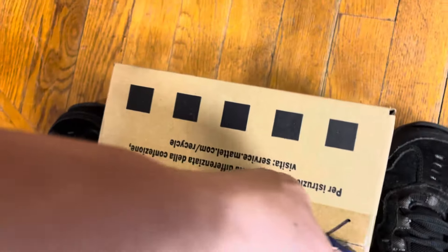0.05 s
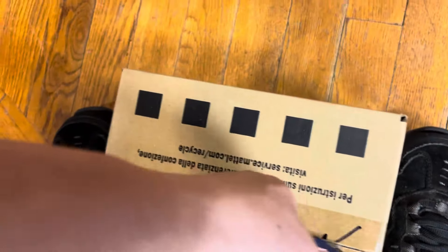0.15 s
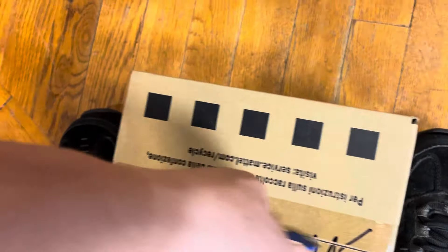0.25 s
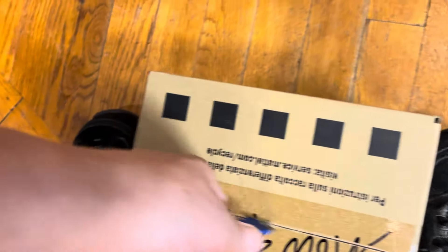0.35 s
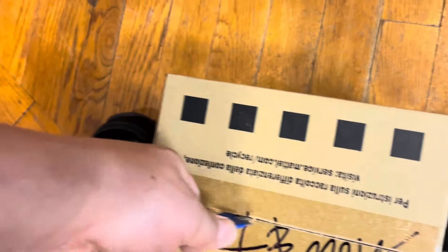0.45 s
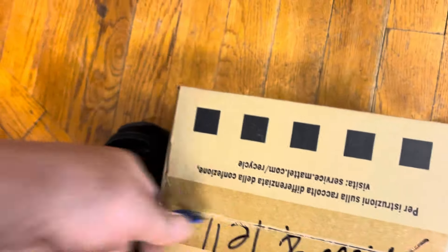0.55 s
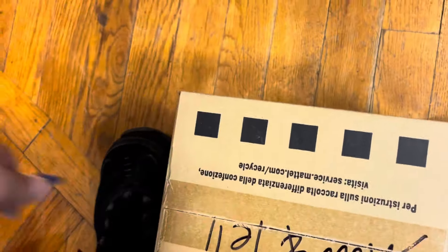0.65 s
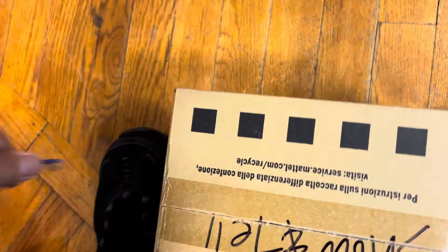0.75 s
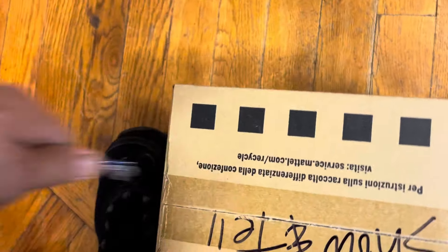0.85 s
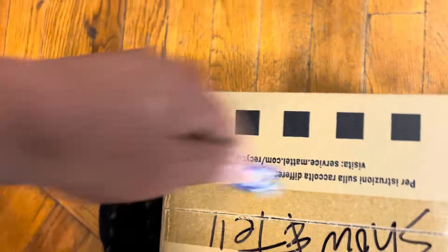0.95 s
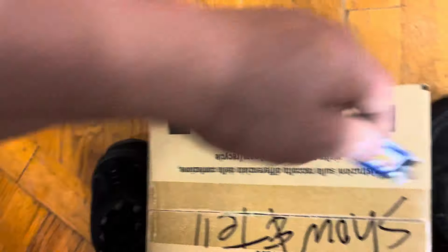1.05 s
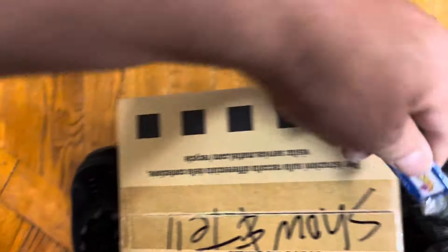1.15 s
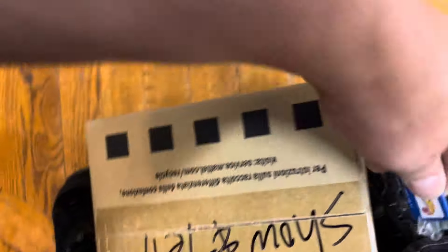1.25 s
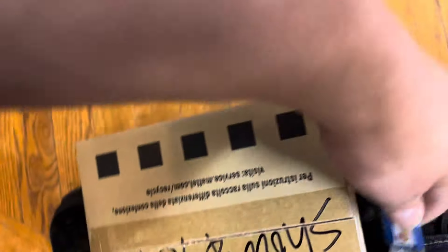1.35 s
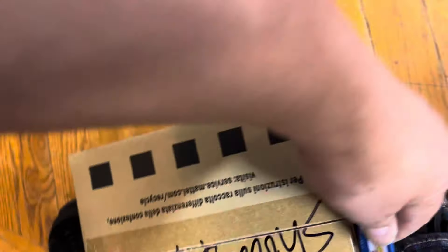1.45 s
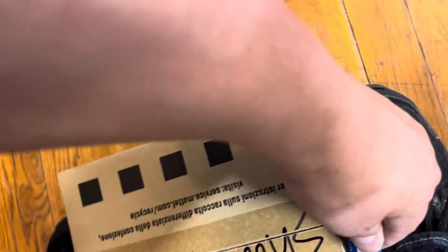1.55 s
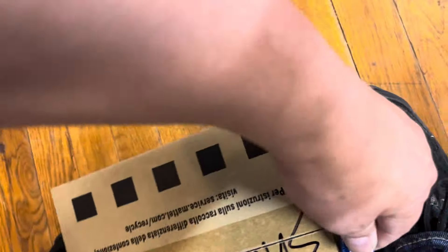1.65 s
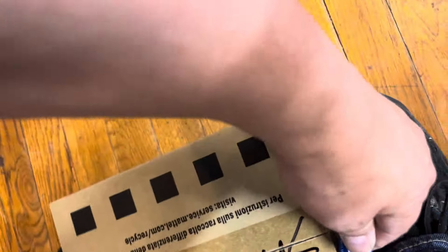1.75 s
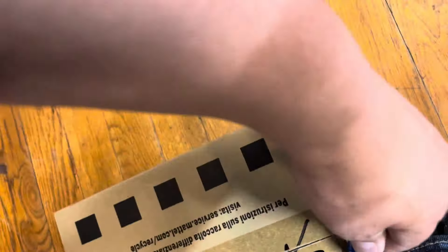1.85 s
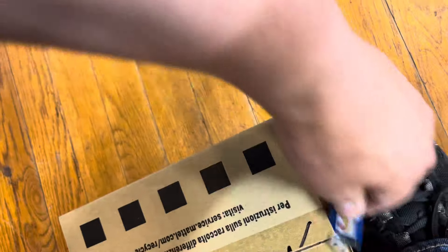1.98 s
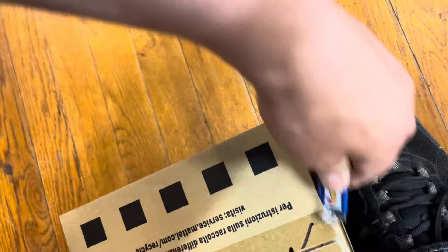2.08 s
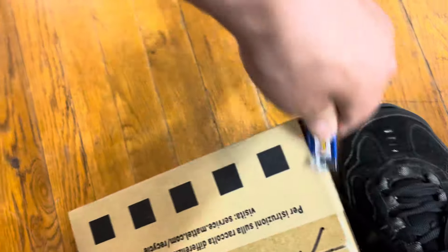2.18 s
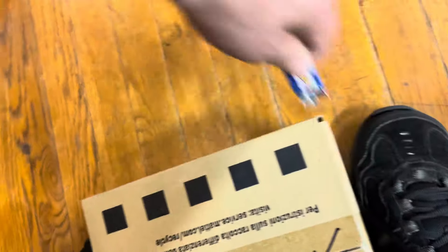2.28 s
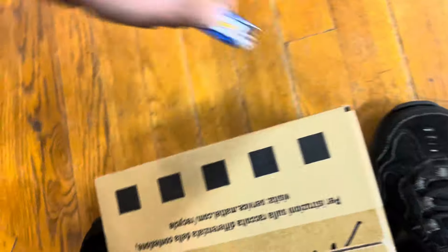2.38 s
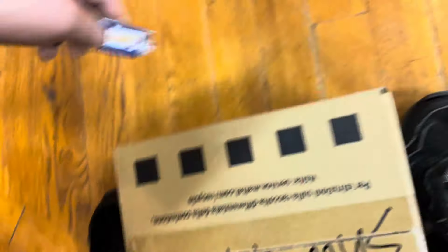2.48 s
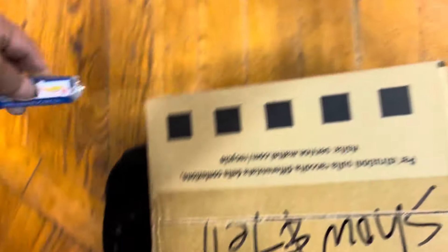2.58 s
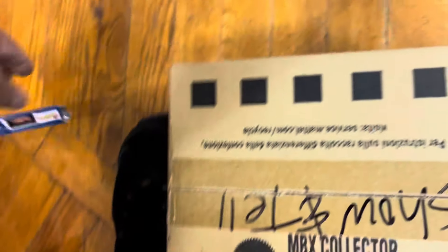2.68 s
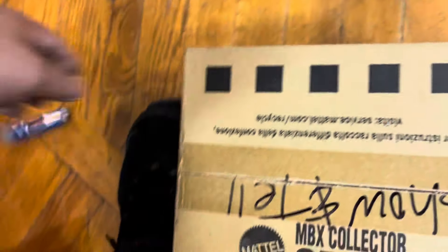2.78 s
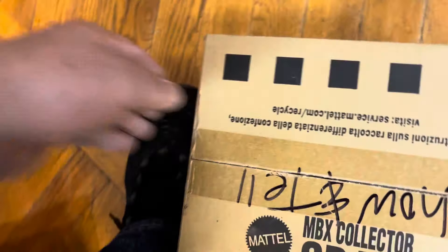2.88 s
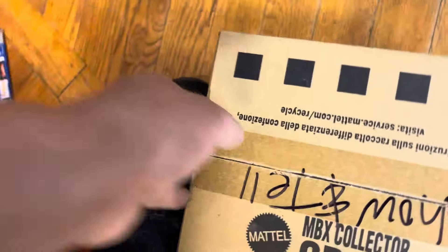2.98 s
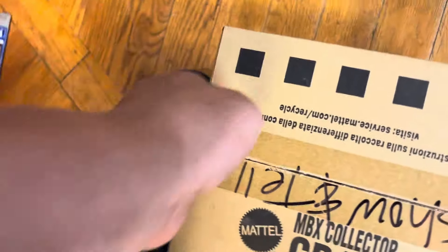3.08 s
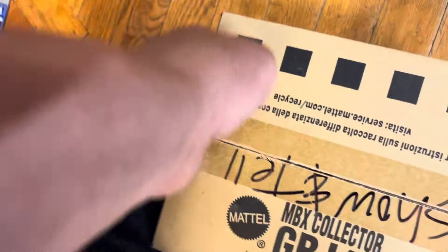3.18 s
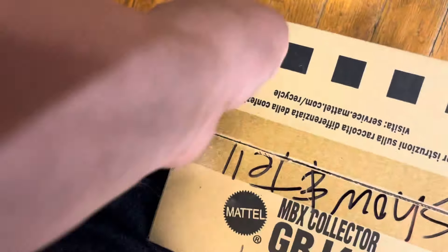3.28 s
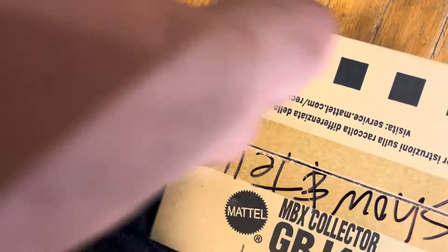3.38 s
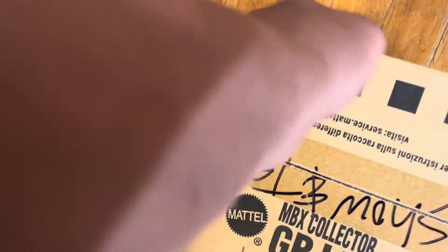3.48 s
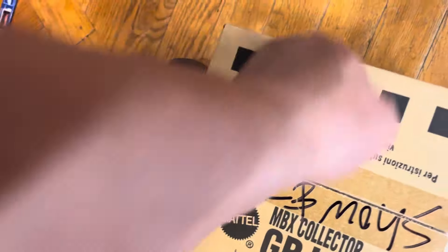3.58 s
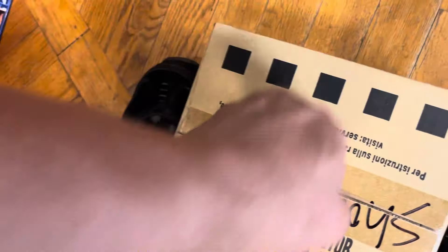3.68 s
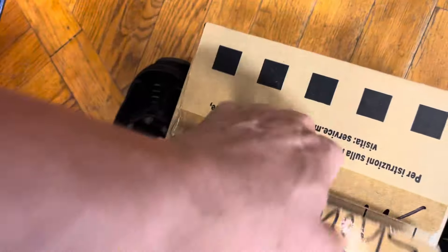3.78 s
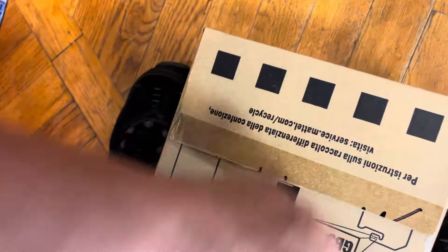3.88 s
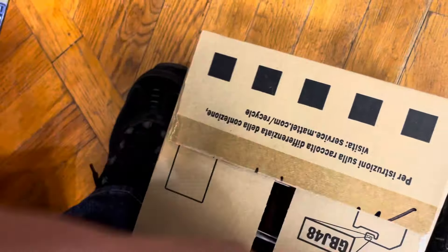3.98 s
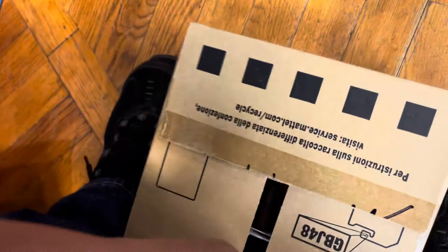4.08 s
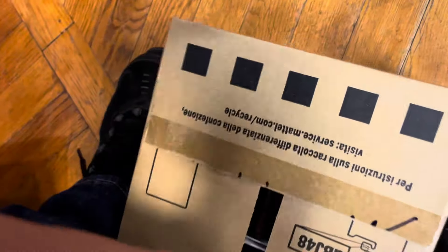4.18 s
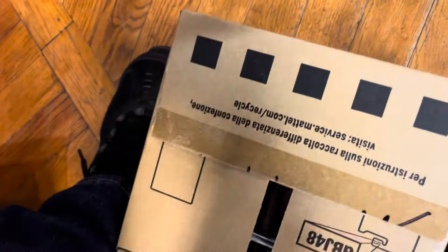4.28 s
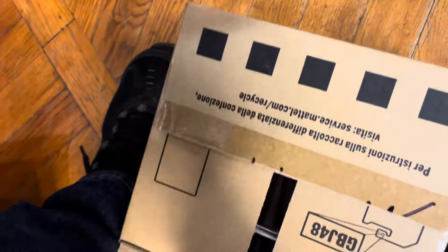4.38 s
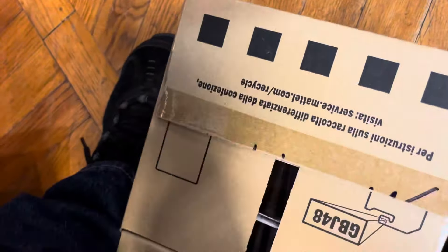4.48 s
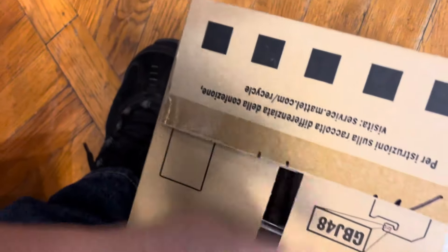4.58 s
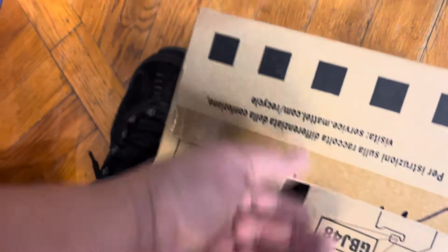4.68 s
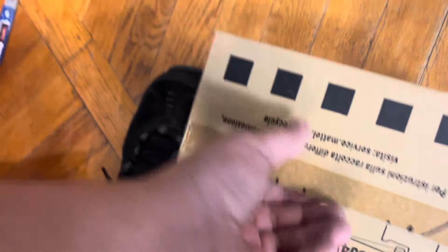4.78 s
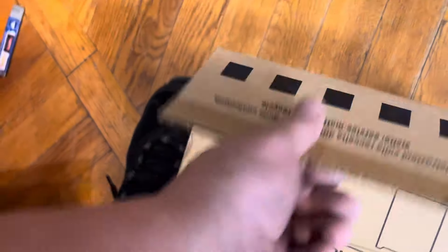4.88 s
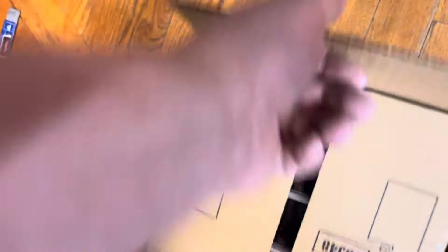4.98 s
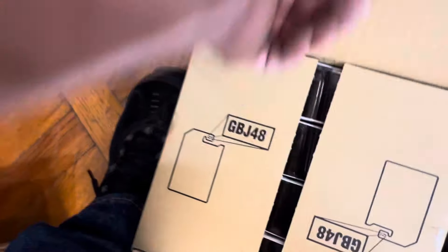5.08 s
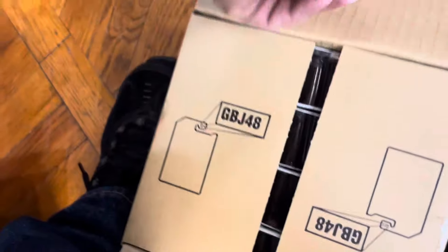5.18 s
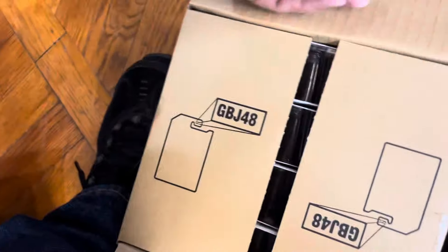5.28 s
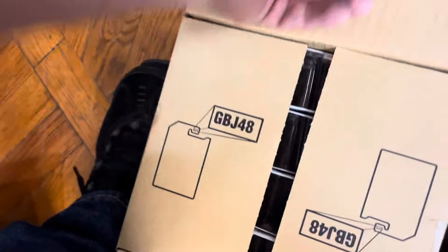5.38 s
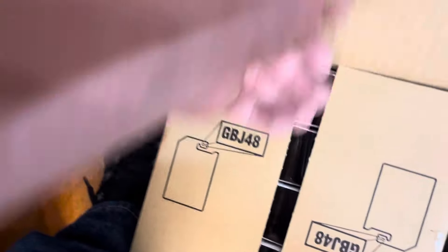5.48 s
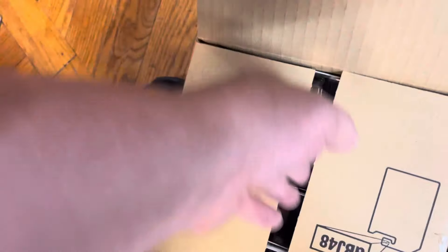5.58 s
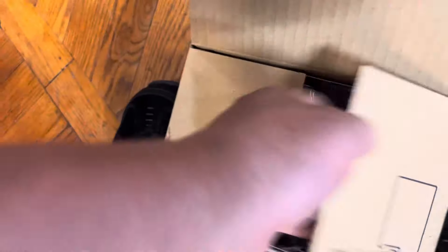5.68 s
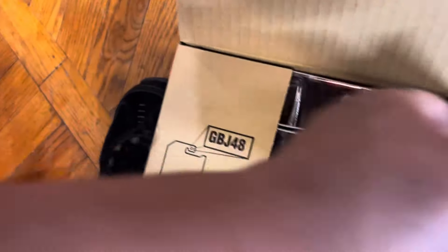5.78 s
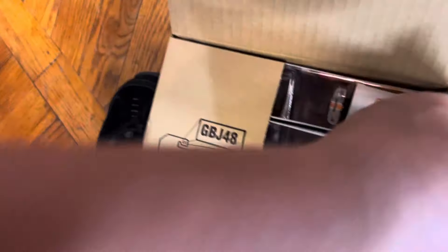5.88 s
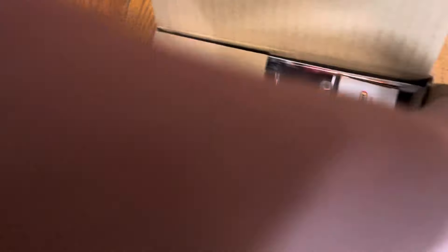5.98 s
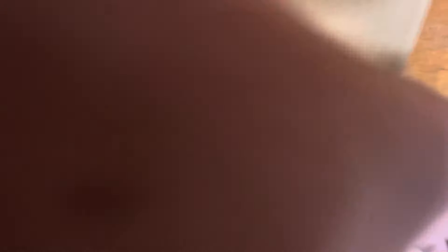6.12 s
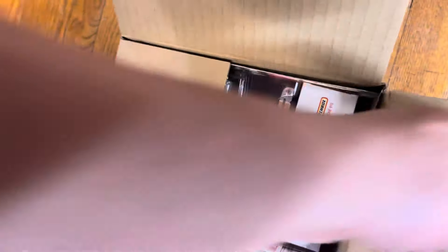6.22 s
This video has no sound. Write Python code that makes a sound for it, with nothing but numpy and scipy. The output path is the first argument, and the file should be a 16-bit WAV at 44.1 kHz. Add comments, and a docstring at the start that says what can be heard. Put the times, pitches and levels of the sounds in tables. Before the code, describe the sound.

Two short cuts through packing tape, a dropped cutter bouncing, then cardboard flaps rubbing, knocking and snapping open up close.

```python
"""A small room with a wooden floor, close to a cardboard carton. A blade slits the tape in two strokes,
the cutter drops and bounces, and hands pull the flaps open. Fibres catch and slip under blade and
skin: they hiss, rasp in the board and set the box droning. Tape snaps in runs of tiny breaks; the
stiff panels answer each knock with a bending wave that falls in pitch. The building rumbles faintly."""
import sys
import numpy as np
from scipy import signal
from scipy.fft import rfft, irfft, next_fast_len
from scipy.io import wavfile
from scipy.ndimage import uniform_filter1d, map_coordinates

SR = 44100
rng = np.random.default_rng(int(sys.argv[2]) if len(sys.argv) > 2 else 0)


def bounce(signal):
    """Save signal as a 16-bit WAV file at the path given by the first command-line argument."""
    frames = np.transpose(np.atleast_2d(signal))
    limited = np.clip(frames, -1, 1)
    pcm = np.round(limited * 32767).astype(np.int16)
    wavfile.write(sys.argv[1], SR, pcm)


N = 275620

# Spectra of room noise, blade friction and rubbing. Each row: frequency in Hz, relative level in dB.
ROOM_TONE_SPECTRUM = [(25, -12.5), (65, 4), (110, -1.5), (300, -15.5), (500, -28.5), (1000, -36.5),
                      (1600, -22.5), (2600, -46), (5000, -44.5), (9000, -64), (13000, -47.5), (16000, -59)]
BLADE_SPECTRUM = [(50, -7.5), (130, 7), (280, 5.5), (600, 0.5), (1000, -1.5), (1450, -4), (1900, -23.5),
                  (2600, -18), (4200, -21), (5600, -27), (7500, -27.5), (11000, -25), (14000, -30.5),
                  (16000, -27)]
RUB_SPECTRUM = [(50, 13.5), (130, 7.5), (280, 10.5), (600, 3), (1000, 0), (1450, 1.5), (1900, -21.5),
                (2600, -17.5), (4200, -19.5), (5600, -21.5), (7500, -20), (11000, -13.5), (14000, -17.5),
                (16000, -32)]
# Modes of the carton, a flap, the lid, and floorboards with cutter case.
# Each row: frequency in Hz, gain in dB, nominal t60 in seconds.
BOX_MODES = [(104.8, 0, 0.12), (148.5, -2.5, 0.06), (196.6, -5.5, 0.045), (254, 0, 0.15), (299, -1.5, 0.13),
             (357, -4.5, 0.12), (547.6, -1.5, 0.027), (690, -6.5, 0.011), (957, -13, 0.098),
             (1280, -21.5, 0.11), (1560, -15, 0.093)]
FLAP_MODES = [(1280, 9, 0.036), (1445, 4, 0.025), (2100, -10.5, 0.037), (2250, -1.5, 0.033),
              (2442, -5, 0.023), (3040, -15, 0.017), (3350, -7, 0.025)]
LID_MODES = [(380, 10.5, 0.098), (690, -4.5, 0.022), (970, 0.5, 0.031), (1250, -5, 0.024),
             (1490, -14.5, .03), (3030, 2, 0.021)]
CLATTER_MODES = [(151, 2, .12), (330, 5, .11), (730, -3, .03), (1385, 5, .05), (1500, 0, .04),
                 (2660, -6, .018), (3800, -4, .008), (4300, -2, .006), (5870, -4, .01), (6510, 0, .011),
                 (7070, -2, .011), (10600, -3, .012), (11820, 0, .009), (13200, -5, .012)]
# Blade along the top seam and through the end tape.
# Each row: time in seconds, then drone, rasp and hiss levels in dB.
SEAM_CUT = [(0, -39, -38.5, -40.5), (0.15, -36.5, -40.5, -43), (0.28, -25, -28, -38.5),
            (0.32, -24.5, -37, -40.5), (0.43, -26, -41, -43), (0.465, -22.5, -29.5, -37.5),
            (0.53, -32.5, -28, -38), (0.58, -24, -22, -28.5), (0.64, -49, -63, -83)]
END_CUT = [(1.85, -73, -57, -67), (1.92, -43, -54, -62), (1.97, -54, -41.5, -55), (2.01, -32, -41.5, -47),
           (2.08, -42.5, -41, -51.5), (2.19, -45, -39, -47.5), (2.26, -32, -46, -53), (2.34, -63, -74, -99)]
# Blade whistle. One row: centre and half length (sign ignored) in seconds, pitch and width in Hz,
# level in dB.
BLADE_WHISTLE = (0.1, -0.29, 10608, 456, -49.5)
# Firm scrapes. Each row: centre and half length in seconds, pitch in Hz, glide in octaves per second,
# level in dB.
SCRAPES = [(0.274, 0.057, 560, 1, -28.5), (.52, 0.039, 540, 0.5, -30.5), (4.383, 0.034, 1445, 1, -34),
           (4.557, 0.028, 640, 1.5, -40), (4.573, 0.014, 1420, 2, -36.5), (4.806, 0.01, 1680, -1.5, -29.5),
           (4.816, 0.049, 710, 0.5, -33), (5.119, 0.0049, 1280, 5.5, -27), (5.281, 0.019, 1100, 1, -59),
           (5.598, 0.017, 1413, 3, -43), (5.847, 0.019, 1317, 4.5, -41), (5.967, 0.0063, 1513, -1, -23)]
# Partials of a scraped flap. Each row: multiple of the pitch, level in dB.
SCRAPE_PARTIALS = [(1, 0), (1.3, -12.5), (1.85, -12), (2.6, -18)]
# Knocks on the carton. Each row: start in seconds, bending-wave travel in ms, air thump in dB,
# panel level in dB, panel pitch in Hz, edge clack in dB, clack pitch in Hz.
KNOCKS = [(0.338, 8.0, -31.0, -17, 284.4, -24.5, 700.0), (0.362, 4.5, -27.5, -27, 223, -36, 504.0),
          (0.444, 6.9, -32, -44, 258.0, -27.5, 530), (0.486, 3.9, -30, -36, 181.0, -28, 615),
          (0.592, 11.7, -17, -14.5, 285, -23.5, 530), (0.923, 4.97, -52, -46, 280, -41, 940),
          (1.419, 7.6, -44.5, -31.0, 290, -50, 624), (1.511, 10.8, -68, -44.5, 335, -45.5, 690),
          (1.586, 9.21, -32, -31, 278, -26, 730), (1.938, 16.2, -38.5, -51, 265, -34.5, 1085.0),
          (2.211, 17.4, -33.5, -37, 286, -27, 880), (2.239, 7.9, -35.5, -28.5, 265.0, -44, 870),
          (3.264, 15, -27, -31, 236, -43, 790), (3.29, 5.6, -50, -40, 260, -39, 800),
          (3.311, 10.4, -26.5, -35, 282, -37, 620), (3.365, 11.1, -63, -32.5, 275, -38.5, 885),
          (3.627, 12.5, -38.0, -59, 316, -47, 822.0), (3.693, 15.1, -28.5, -39, 270, -50, 1110),
          (3.767, 11.6, -33, -35.5, 257.0, -36, 746), (3.831, 15, -26, -29.5, 248, -34, 770),
          (3.914, 14.7, -28.5, -40, 262, -37.5, 1250), (4.178, 13.7, -20, -25, 266, -30.5, 1020),
          (4.331, 3.7, -41, -25.5, 443, -34.0, 1238.0), (4.37, 9, -31, -21.5, 435, -21.5, 1290),
          (4.655, 11.4, -25, -20, 256, -23, 810), (4.699, 8.8, -26, -33, 327, -27, 720),
          (4.705, 6.5, -30, -21, 320, -34.5, 1250), (4.775, 11.4, -33, -34.5, 240, -26.5, 800),
          (4.939, 4.34, -52.5, -45, 233.0, -39.5, 1140), (5, 11.5, -16.5, -28, 299.0, -33, 536),
          (5.04, 10.5, -18.0, -14.5, 300, -26, 1300), (5.07, 5.8, -34, -31, 332, -54, 600),
          (5.123, 19, -27, -28.0, 252, -37, 1130), (5.402, 15.8, -38.5, -43, 349.0, -55.0, 917.0),
          (5.541, 14.2, -34, -31, 253, -33.5, 840), (5.551, 10.6, -28.5, -29, 228, -29, 690),
          (5.652, 5, -28.5, -16, 288, -18.5, 1324), (5.679, 5.6, -39, -36, 276, -46, 700),
          (5.883, 11, -23, -28, 304, -28.5, 530), (5.897, 11.6, -24.5, -27, 276, -46, 600),
          (5.973, 12.4, -31, -21.5, 264, -22.5, 1210), (6.033, 7.06, -25.5, -21.5, 325, -25, 1340)]
# Reflections from panel creases. Each row: delay as a share of the travel time, gain in dB.
CREASE_ECHOES = [(0.171, -12), (0.411, -12.5), (0.901, -16)]
# Tape and fibre snaps, blade ticks. Each row: start in seconds, crack in dB, treble in dB,
# crack pitch in Hz.
SNAPS = [(0.338, -21.5, -20, 5130), (0.486, -30.5, -36, 3230), (0.593, -25.5, -26.5, 2400),
         (0.922, -40, -67, 2660), (1.317, -52, -60, 3930), (1.359, -53, -60, 3960), (1.417, -48, -60, 3800),
         (1.529, -48, -53.5, 3900), (1.586, -40, -47, 3830), (1.653, -42.5, -58, 3350),
         (1.675, -43, -49, 4300), (1.874, -28.5, -34, 4000), (1.905, -44, -47, 4400),
         (1.939, -28, -29.5, 4340), (1.998, -40.5, -46, 7000), (2.013, -36.5, -44, 4300),
         (2.036, -43, -36, 4400), (2.046, -52, -43, 4400), (2.063, -37, -34.5, 4400),
         (2.211, -17.5, -24, 7660), (2.259, -45, -40, 4350), (2.29, -45.5, -55, 3500),
         (2.436, -64, -49.5, 7600), (2.466, -50, -41, 7700), (2.485, -53.5, -47.5, 4300),
         (3.365, -41, -51.5, 2930), (3.627, -45, -51, 2830), (3.767, -31, -43, 4130),
         (3.85, -39, -55, 4300), (3.914, -35.5, -41.5, 3420), (4.027, -41, -47, 7300),
         (4.061, -42.5, -48, 6450), (4.178, -40.5, -66, 2400), (4.331, -36.5, -51, 2500),
         (4.371, -23.5, -47, 2400), (4.655, -36, -39, 7100), (4.703, -34, -41.5, 7000),
         (4.776, -34.5, -43, 7040), (5.04, -27, -42, 2630), (5.128, -23, -42, 4800),
         (5.542, -43, -52, 4210), (5.651, -15, -17.5, 7000), (5.967, -19, -24, 6600),
         (5.973, -18, -25, 5240), (5.981, -18, -24.5, 5040), (6.033, -20, -29.5, 2400),
         (6.07, -43, -37, 7000)]
# Taut tape near the seam's end. Each row: time in seconds, lower and upper pitch in Hz, level in dB.
TAPE_GLIDE = [(.46, 1200, 3130, -66), (0.499, 1244, 3140, -37), (0.528, 1340, 3130, -33.5),
              (0.559, 1280, 2920, -42), (0.592, 1100, 2650, -72), (0.609, 1100, 2600, -77)]
# Light hand contact. Each row: start and end in seconds, then drone, rasp and hiss levels in dB.
HAND_CONTACT = [(0.677, 1.847, -71, -72, -76), (3.123, 4.64, -54, -55.5, -62),
                (4.641, 5.449, -55, -60, -54.5), (5.529, 6.246, -50, -51, -57)]
# Strokes of hands and flaps. Each row: peak time, rise and fall in seconds, then drone, rasp and
# hiss levels in dB.
STROKES = [(.765, 0.055, 0.031, -48, -72, -67.5), (0.884, .015, 0.012, -59, -45, -59),
           (0.924, 0.01, 0.018, -55, -44, -42.5), (1.585, .022, 0.049, -52, -48, -54),
           (1.659, 0.042, 0.067, -51, -49, -54.5), (3.296, 0.14, 0.076, -35, -42, -42.5),
           (3.313, 0.022, 0.015, -47, -45, -33.5), (3.42, 0.15, 0.096, -62, -67, -51.5),
           (3.517, 0.085, 0.098, -42, -43, -45), (3.615, 0.033, 0.036, -39, -48, -47),
           (3.686, 0.035, 0.039, -28.5, -41, -48.5), (3.833, 0.0083, 0.037, -35, -29, -33),
           (3.874, 0.059, 0.024, -31.5, -54, -59.5), (3.945, 0.077, 0.055, -35.5, -41.5, -42.5),
           (4.07, 0.104, 0.16, -46.5, -42.5, -53), (4.269, 0.13, 0.2, -34.5, -35.5, -36.5),
           (4.384, 0.1, 0.07, -28, -19.5, -26), (4.563, 0.076, 0.04, -31.5, -30.5, -30),
           (4.687, 0.032, 0.059, -28, -52, -43.5), (4.801, 0.014, 0.07, -33.5, -27, -25),
           (5.0, 0.05, 0.11, -38, -31.5, -39), (5.128, 0.016, 0.046, -22.5, -18, -24.5),
           (5.255, 0.06, 0.079, -64, -45.5, -41), (5.421, 0.13, 0.021, -63, -51, -46),
           (5.563, 0.025, .07, -22.5, -28.5, -48), (5.6, 0.034, 0.02, -33, -26, -31),
           (5.65, 0.0097, 0.0066, -35, -24, -31.5), (5.729, 0.03, 0.03, -34.5, -37, -42),
           (5.785, 0.04, 0.028, -42, -37, -43.5), (5.841, 0.02, 0.029, -44, -45, -30),
           (5.975, 0.014, 0.014, -24, -10.5, -17), (6.014, 0.16, 0.15, -33.5, -38, -33.5),
           (6.031, .012, 0.01, -40, -31, -22.5), (6.206, 0.0446, 0.016, -51, -43.5, -48)]
# Cutter bounces. Each row: start in seconds, then floor thud, case clack, case rattle and blade tick in dB.
BOUNCES = [(2.75, -28.5, -17, -19.5, -18.5), (2.765, -30.5, -16.5, -18.5, -23),
           (2.778, -25, -40, -15.5, -18), (2.861, -40, -40, -45, -52), (2.889, -26, -22.5, -17.5, -26),
           (2.969, -33, -42, -21.5, -29.5), (3.009, -42, -34, -31.5, -37), (3.033, -58, -40.5, -41, -43),
           (3.069, -70, -54, -63, -56)]
# Room decay. Each row: frequency in Hz, t60 in seconds.
ROOM_DECAY = [(100, 0.53), (400, 0.41), (1500, 0.34), (5000, 0.41), (15000, 0.28)]
# Reverb spectrum. Each row: frequency in Hz, gain in dB.
REVERB_SPECTRUM = [(100, -14.5), (400, -13), (1000, -14.5), (2000, -15.5), (6000, -14.5), (15000, -24)]
# Two microphone ports. Each row: frequency in Hz, left phase lead in radians, left minus right in dB.
PORT_RESPONSE = [(100, 0, 0.5), (380, 0.5, 0), (667, 0.77, -5), (1100, 1.52, -3), (1470, 0.88, -4.5),
                 (1800, 2.5, 3), (2500, 1.5, 3.5), (3970, 0.44, 2.5), (5810, 1.95, -2), (6150, -0.22, 3.5),
                 (9450, -5, -10.5), (11330, -5.5, 6.5), (11660, -5.5, -1.5), (15150, -9, 0.5)]
# Direction of the action. Each row: time in seconds, extra lead of the left port in ms.
BEARING = [(0, -0.08), (2.4, -0.039), (2.75, 0.026), (3.1, -0.038), (3.5, -0.069), (4.5, -0.073),
           (5.2, -0.095), (6.2, -0.06)]


def amp(db):
    """Decibels to gain."""
    return 10 ** (np.asarray(db) / 20)


def unit_rms(x):
    """Scale to rms 1."""
    return x / np.sqrt(np.mean(x ** 2) + 1e-20)


def with_energy(x, seconds):
    """Scale to the energy of that many seconds at rms 1."""
    return x * np.sqrt(seconds * SR / (np.sum(x ** 2) + 1e-20))


def bin_hz(size):
    """Frequencies of the rfft bins."""
    return np.fft.rfftfreq(size, 1 / SR)


def lookup(table, hz, column=1):
    """Interpolate a column over log frequency."""
    table = np.array(table, float)
    return np.interp(np.log(hz + 1), np.log(table[:, 0] + 1), table[:, column])


def add(mix, start_s, sound):
    """Mix a sound in, in place."""
    part = mix[max(0, round(start_s * SR)):][:len(sound)]
    part += sound[:len(part)]


def band(x, lo_hz, hi_hz, order=3):
    """Causal band-pass."""
    edges_hz = [lo_hz, min(hi_hz, SR / 2 - 100)]
    return signal.sosfilt(signal.butter(order, edges_hz, "band", fs=SR, output="sos"), x)


def lowpass(x, hz, slope=4):
    """Zero-phase low-pass."""
    size = x.shape[-1]
    return irfft(rfft(x) / (1 + (bin_hz(size) / hz) ** slope), size)


def resonate(x, hz, q):
    """One resonance of peak gain 1."""
    return signal.lfilter(*signal.iirpeak(hz, max(q, 1), fs=SR), x)


def ring(x, modes):
    """Drive the modes of a body."""
    return sum(amp(db) * resonate(x, hz, hz * t60_s / 2) for hz, db, t60_s in modes)


def coloured(x, spectrum):
    """Filter by a spectrum table."""
    return irfft(rfft(x) * amp(lookup(spectrum, bin_hz(len(x)))), len(x))


def wander(hz, size=N):
    """Low-passed noise of rms 1."""
    return unit_rms(lowpass(rng.standard_normal(size), hz))


def fuzzy_tone(cycles, width_hz):
    """Narrow noise band around a carrier whose phase is given in cycles."""
    fuzz = wander(width_hz, len(cycles)) + 1j * wander(width_hz, len(cycles))
    return (fuzz * np.exp(2j * np.pi * cycles)).real


def bend(x, travel_ms, front_hz=2438.0):
    """Bending wave: speed grows as the root of frequency, so bass lags. Travel time is at 100 Hz."""
    size = next_fast_len(len(x) + 4096)
    slowness = np.sqrt(100 / np.clip(bin_hz(size), 50, front_hz))
    delay_s = travel_ms / 1000 * (slowness - slowness[-1])
    phase = 2 * np.pi * np.cumsum(delay_s) * SR / size
    return irfft(rfft(x, size) * np.exp(-1j * phase), size)[:len(x)]


def room_tone(level_db=-48.0, waver_db=2.0, apart_db=-9.5, rumble_hz=409.0):
    """Wavering building rumble under a faint steady hiss, nearly alike at both ports."""
    shared, left, right = (unit_rms(coloured(rng.standard_normal(N), ROOM_TONE_SPECTRUM))
                           for _ in range(3))
    air = amp(level_db) * (shared + amp(apart_db) * np.array([left, right]))
    rumble = lowpass(air, rumble_hz)
    return air - rumble + rumble * amp(waver_db * wander(23.0))


def cutting_gains(cut):
    """Drone, rasp and hiss envelopes of one blade pass."""
    times_s, *levels_db = np.transpose(cut)
    t = np.arange(N) / SR
    active = (t >= times_s[0]) & (t <= times_s[-1] + .05)
    return active * np.array([amp(np.interp(t, times_s, db)) for db in levels_db])


def hollow(x, echo_gain, gap_ms, drift=0.177, drift_hz=4.7):
    """Echoes between hand, flap and box; the gaps change, so the comb peaks shift."""
    n = np.arange(N)
    for path in 1, 2.3, 4.1:
        lag = path * gap_ms * SR / 1000 * np.exp(drift * wander(drift_hz) / path)
        x = x + echo_gain * map_coordinates(x, [n - lag], order=2)
    return x


def shifting_colour(x, depth_db, bins=7, frames=15):
    """Random narrow peaks come and go, giving the friction a shifting colour."""
    spectra = signal.stft(x, nperseg=512, noverlap=384)[2]
    peaks = rng.standard_normal(spectra.shape)
    for axis, size in (0, bins), (1, frames), (0, bins):
        peaks = uniform_filter1d(peaks, size, axis=axis)
    return signal.istft(spectra * amp(depth_db * unit_rms(peaks)), nperseg=512, noverlap=384)[1][:N]


def friction(gains, spectrum, *, slips_per_s, spread_db, smooth_db, catch_db, catch_hz, box_db, flap_db,
             echo_gain, gap_ms, fizz_db, fizz_power, shift_db, swell_db, swell_hz):
    """Fibres catch and slip in clumps: hiss at the contact, rasp in the board, drone in the box."""
    drone, rasp, hiss = gains
    sizes = amp(spread_db * np.minimum(rng.exponential(1, N), 4)) * rng.choice([-1, 1], N)
    slips = unit_rms(sizes * (rng.random(N) < slips_per_s / SR))
    slips += amp(smooth_db) * rng.standard_normal(N)
    slips *= amp(catch_db * wander(catch_hz))
    contact = coloured(hollow(slips, echo_gain, gap_ms), spectrum)
    contact += amp(flap_db) * ring(contact, FLAP_MODES)
    contact = shifting_colour(contact, shift_db) * amp(swell_db * wander(swell_hz))
    board = bend(contact, travel_ms=12.117)
    board += amp(box_db) * ring(board, BOX_MODES)
    fizz = amp(fizz_db) * (hiss / amp(-45)) ** fizz_power  # power < 1: light strokes sound brighter
    return (drone * unit_rms(band(board, 69.5, 452, order=4))
            + rasp * unit_rms(band(board, 525, 2190, order=4))
            + hiss * unit_rms(band(contact, 1668, 6430, order=4))
            + fizz * unit_rms(band(contact, 7250, 24000, order=4)))


def blade_whistle():
    """The blade's edge whistles thinly as it enters the tape."""
    centre_s, half_s, hz, width_hz, db = BLADE_WHISTLE
    t = np.arange(N) / SR
    return amp(db) * np.exp(-((t - centre_s) / half_s) ** 2) * fuzzy_tone(hz * t, width_hz)


def crackle(hiss_gain, ticks_per_s=80.0, spread_db=2.5, decay_s=0.0039, growth=0.43, level_db=-61.0):
    """Fibres and crumbs of glue give way at random, a little louder under a firm stroke."""
    t = np.arange(512) / SR
    sizes = amp(spread_db * np.minimum(rng.exponential(1, N), 3))
    breaks = sizes * (rng.random(N) < ticks_per_s / SR) * hiss_gain ** growth
    ticks = signal.oaconvolve(breaks, np.exp(-t / decay_s))[:N] * rng.standard_normal(N)
    ticks += amp(7.0) * ring(ticks, FLAP_MODES)
    return amp(level_db) * unit_rms(band(ticks, 1200, 6000, order=2))


def scrapes(width_hz=99.0):
    """A firm scrape makes the flap sing; its fuzzy note slides with the contact."""
    out, t = np.zeros(N), np.arange(-4096, 4096) / SR
    for centre_s, half_s, hz, octaves_per_s, db in SCRAPES:
        cycles = np.cumsum(hz * 2 ** (octaves_per_s * t)) / SR
        note = sum(amp(partial_db) * fuzzy_tone(multiple * cycles, width_hz)
                   for multiple, partial_db in SCRAPE_PARTIALS)
        add(out, centre_s + t[0], amp(db) * np.exp(-(t / half_s) ** 2) * note)
    return out


def knocks(panel_q=2.8, clack_q=6.7, plain_db=-14.5, crunch_db=-29, crunch_s=0.0052):
    """A blow crushes fibres and runs through the board to the enclosed air, panel and stiff edge."""
    out, t = np.zeros(N), np.arange(8192) / SR
    for start_s, travel_ms, thump_db, panel_db, panel_hz, clack_db, clack_hz in KNOCKS:
        push = (t == 0) + amp(crunch_db) * rng.standard_normal(len(t)) * np.exp(-t / crunch_s)
        front = bend(push, travel_ms)
        wave = front + sum(amp(db) * np.interp(t - share * travel_ms / 1000, t, front, left=0)
                           for share, db in CREASE_ECHOES)
        body = amp(plain_db) * wave + ring(wave, BOX_MODES)
        thump = band(body, 56, 188.5, order=2)
        panel = band(body + resonate(wave, panel_hz, panel_q), .603 * panel_hz, 1.2 * panel_hz, order=2)
        clack = band(body + resonate(wave, clack_hz, clack_q), .6 * clack_hz, 1.536 * clack_hz)
        for part, db in (thump, thump_db), (panel, panel_db), (clack, clack_db):
            add(out, start_s, amp(db) * with_energy(part, .03))
    return out


def snaps(decay_s=0.00133, crack_q=11.7, plain_db=-11.5, flap_db=-7.0, flutter_db=-29.5, flutter_s=0.02):
    """A snap is a quick run of tiny breaks; the freed tape flutters briefly after it."""
    out, t = np.zeros(N), np.arange(4096) / SR
    burst = (1 - np.exp(-4 * t / decay_s)) * np.exp(-t / decay_s)
    flutter = amp(flutter_db) * np.exp(-t / flutter_s)
    for start_s, crack_db, treble_db, crack_hz in SNAPS:
        breaks = rng.standard_normal(len(t)) * (burst + flutter)
        body = amp(plain_db) * breaks + amp(flap_db) * ring(breaks, FLAP_MODES)
        crack = band(body + resonate(breaks, crack_hz, crack_q), 1920, 6400)
        treble = band(breaks, 5860, 14000, order=2)
        for part, db in (crack, crack_db), (treble, treble_db):
            add(out, start_s, amp(db) * with_energy(part, .005))
    return out


def singing_tape(width_hz=290.0, upper_db=-3.5):
    """Two fuzzy resonances of the taut tape glide as the blade travels."""
    times_s, lower_hz, upper_hz, db = np.transpose(TAPE_GLIDE)
    t = np.arange(N) / SR
    lower = fuzzy_tone(np.cumsum(np.interp(t, times_s, lower_hz)) / SR, width_hz)
    upper = fuzzy_tone(np.cumsum(np.interp(t, times_s, upper_hz)) / SR, width_hz)
    return amp(np.interp(t, times_s, db, left=-120, right=-120)) * (lower + amp(upper_db) * upper)


def rubbing_gains(ease_s=0.018, range_db=20.0, roundness=1.084):
    """Drone, rasp and hiss envelopes of the hands: strokes add in power over a light contact."""
    t = np.arange(N) / SR
    touching, power = np.zeros(N), np.zeros((3, N))
    for start_s, end_s, *levels_db in HAND_CONTACT:
        contact = np.clip(np.minimum(t - start_s, end_s - t) / ease_s, 0, 1)
        touching += contact
        power += np.outer(amp(levels_db), contact > 0) ** 2
    for peak_s, rise_s, fall_s, *levels_db in STROKES:
        from_peak = np.maximum((peak_s - t) / rise_s, (t - peak_s) / fall_s)
        swell = amp(-range_db * np.minimum(from_peak, 10) ** roundness)
        power += np.outer(amp(levels_db), swell) ** 2
    return touching * np.sqrt(power)


def dropped_cutter(contact_s=0.0021, rattle_db=-22.0, rattle_s=0.026, ring_db=-3.0, detune=0.076):
    """At each bounce the floorboards thud, the plastic case rings and the loose blade rattles."""
    out, t = np.zeros(N), np.arange(8192) / SR
    floor_wave = bend(1. * (t == 0), travel_ms=7.95)
    thud = band(ring(floor_wave, CLATTER_MODES + BOX_MODES), 67, 750, order=2)
    envelope = np.exp(-t / contact_s) + amp(rattle_db) * np.exp(-t / rattle_s)
    for start_s, thud_db, clack_db, case_db, tick_db in BOUNCES:
        contact = rng.standard_normal(len(t)) * envelope
        case = contact.copy()
        for hz, db, t60_s in CLATTER_MODES:  # each landing corner favours other modes
            gain = amp(ring_db - rng.standard_normal())
            mode_hz = hz * np.exp(detune * rng.uniform(-0.8, 1))
            case += gain * ring(contact, [(mode_hz, db, t60_s)])
        handle = resonate(contact, hz=1470.0, q=11.5)
        clack = band(amp(-6.0) * case + handle, 556, 1770)
        add(out, start_s, amp(thud_db) * with_energy(thud, 0.035))
        add(out, start_s, amp(clack_db) * with_energy(clack, 0.007))
        add(out, start_s, amp(case_db) * with_energy(band(case, 1800, 8300), 0.0049))
        add(out, start_s, amp(tick_db) * with_energy(band(case, 10800, 15500), 0.0031))
    return out


def fingertip_judder(start_s=3.526, count=3, gap_s=0.0041, slip_s=0.00034, level_db=-31.0):
    """Skin sticks and slips a few times; the lid rings hollow."""
    out, t = np.zeros(N), np.arange(8192) / SR
    slips = np.zeros(len(t))
    for k in range(count):
        add(slips, k * gap_s, np.exp(-t / slip_s) * (1 - t / slip_s))
    add(out, start_s, amp(level_db) * with_energy(ring(slips, LID_MODES), .03))
    return out


def room_echoes(x, first_s=0.001133, early_db=4.5, early_s=0.023, echoes_per_s=4000):
    """Floor and furniture return early echoes, then a short tail; a new random pattern per call."""
    t = np.arange(SR // 2) / SR
    taps = rng.standard_normal(len(t)) * (rng.random(len(t)) < echoes_per_s / SR) * (t > first_s)
    taps *= 1 + amp(early_db) * np.exp(-t / early_s)
    hz, age_s, spectra = signal.stft(taps, SR, nperseg=256)
    spectra *= amp(-60 * age_s / lookup(ROOM_DECAY, hz)[:, None])
    band_energy = uniform_filter1d((abs(spectra) ** 2).sum(1), 5)
    tail = signal.istft(spectra / np.sqrt(band_energy)[:, None], SR, nperseg=256)[1]
    return signal.fftconvolve(x, coloured(tail / np.linalg.norm(tail), REVERB_SPECTRUM))[:N]


def reverb(x, crossfade_hz=3.1):
    """Room reverb, cross-faded among three random echo patterns so repeated hits do not ring alike."""
    angle = 2 * np.pi * crossfade_hz * np.arange(N) / SR
    return sum(room_echoes(x * np.sqrt(2 / 3) * np.cos(angle + 2 * np.pi * k / 3)) for k in range(3))


def microphone_ports(x):
    """Two ports hear the near sound with different phase and level."""
    hz = bin_hz(N)
    lead_rad = lookup(PORT_RESPONSE, hz)
    lean = amp(lookup(PORT_RESPONSE, hz, column=2) / 2)
    response = np.array([lean, np.exp(-1j * lead_rad) / lean]) / np.sqrt((lean ** 2 + lean ** -2) / 2)
    return irfft(rfft(x) * response, N)


def steered(pair, top_hz=2400.):
    """Lows and mids reach one port sooner as the action moves."""
    n = np.arange(N)
    lead = np.interp(n / SR, *np.transpose(BEARING)) * SR / 1000
    low = lowpass(pair, top_hz, slope=8)
    shifted = np.array([np.interp(n + lead / 2, n, low[0]), np.interp(n - lead / 2, n, low[1])])
    return pair - low + shifted


def near_echoes(x, level_db=-17.5, decay_s=0.0041):
    """Sound from box, arm and floor reaches each port a few milliseconds late."""
    t = np.arange(2048) / SR
    taps = rng.standard_normal((2, len(t))) * np.exp(-t / decay_s) * (t > .001)
    taps = band(taps / np.linalg.norm(taps, axis=1, keepdims=True), 68, 7000, order=1)
    return amp(level_db) * signal.oaconvolve(x[None], taps, axes=1)[:, :N]


def scene(near_room_db=-3.5, diffuse_db=-8.5, cutter_send_db=9.5):
    """Carton and dropped cutter in the room, in stereo."""
    seam_gains, end_gains, hand_gains = cutting_gains(SEAM_CUT), cutting_gains(END_CUT), rubbing_gains()
    seam_cut = amp(-0.5) * friction(
        seam_gains, BLADE_SPECTRUM, slips_per_s=1300, spread_db=3.5, smooth_db=-1.5,
        catch_db=1.8, catch_hz=110, box_db=0.5, flap_db=-6, echo_gain=0.19, gap_ms=0.9,
        fizz_db=-49, fizz_power=1, shift_db=2.75, swell_db=1, swell_hz=22)
    end_cut = amp(2.5) * friction(
        end_gains, BLADE_SPECTRUM, slips_per_s=1700, spread_db=4.5, smooth_db=4,
        catch_db=1, catch_hz=90, box_db=-1.5, flap_db=-13, echo_gain=0.28, gap_ms=1.1,
        fizz_db=-43.5, fizz_power=1, shift_db=3, swell_db=1.5, swell_hz=25)
    hands = amp(-0.5) * friction(
        hand_gains, RUB_SPECTRUM, slips_per_s=3000, spread_db=2.5, smooth_db=-3.5,
        catch_db=1.07, catch_hz=68, box_db=-32, flap_db=-7, echo_gain=0.3, gap_ms=1.3,
        fizz_db=-54, fizz_power=0.82, shift_db=3, swell_db=0.95, swell_hz=36)
    _, _, hiss_gain = seam_gains + end_gains + hand_gains
    cutter = amp(-0.5) * dropped_cutter()
    blade = seam_cut + end_cut + blade_whistle() + singing_tape()
    carton = blade + hands + crackle(hiss_gain) + fingertip_judder() + scrapes() + knocks() + snaps()
    direct = carton + cutter
    send = carton + amp(cutter_send_db) * cutter
    diffuse = amp(diffuse_db) * np.array([reverb(send), reverb(send)])
    near = steered(microphone_ports(direct + amp(near_room_db) * reverb(send)))
    return near + near_echoes(direct) + diffuse + room_tone()


def record(dry):
    """Soft-clip the peaks, then low-pass at 15.5 kHz."""
    rounded = dry / (1 + dry ** 6) ** (1 / 6)
    taps = signal.firwin(201, 15500, window=("kaiser", 9), fs=SR)
    return signal.oaconvolve(rounded, taps[None], "same")


dry = scene()
out = record(dry)
bounce(out)
```